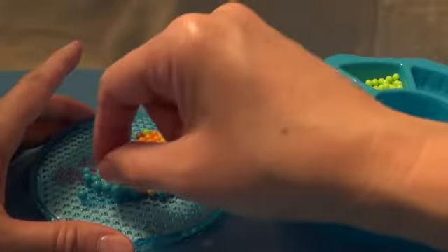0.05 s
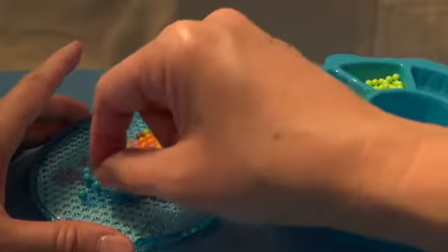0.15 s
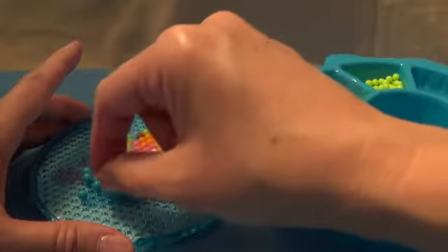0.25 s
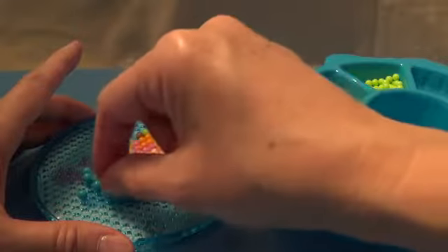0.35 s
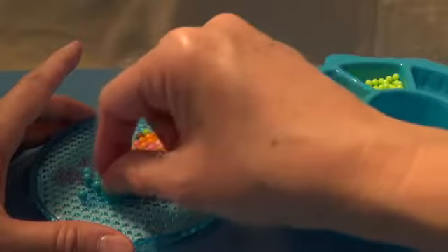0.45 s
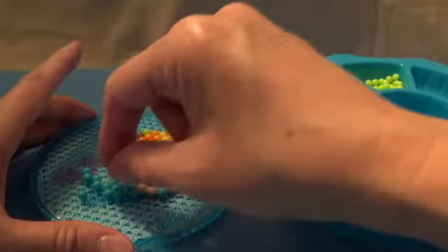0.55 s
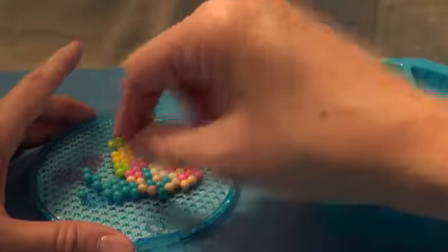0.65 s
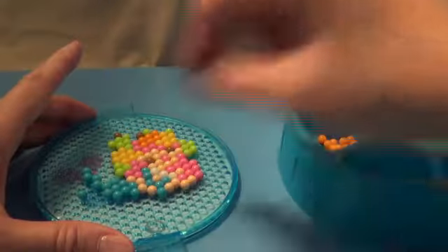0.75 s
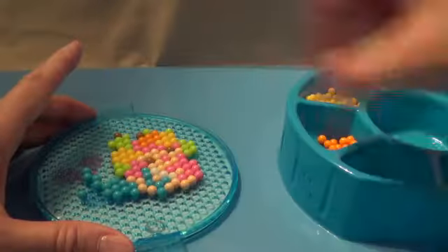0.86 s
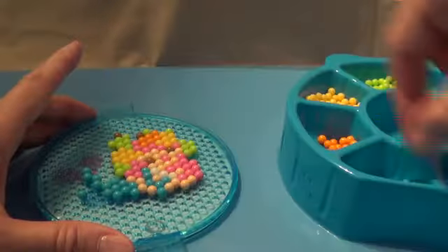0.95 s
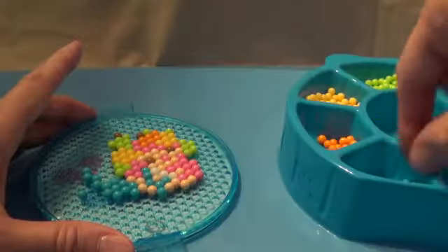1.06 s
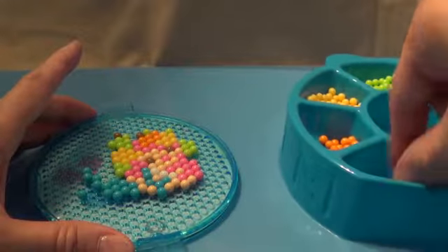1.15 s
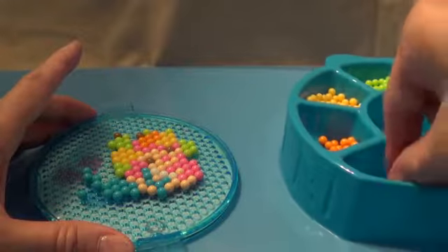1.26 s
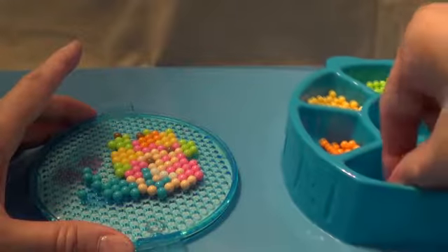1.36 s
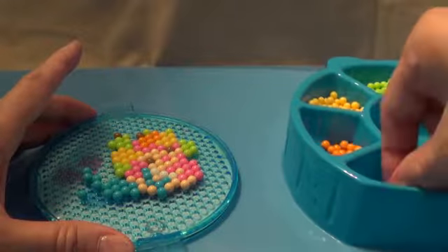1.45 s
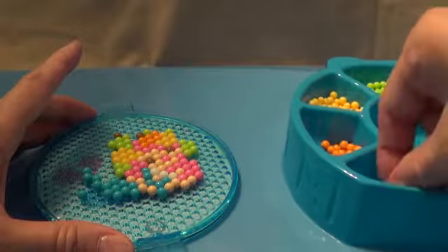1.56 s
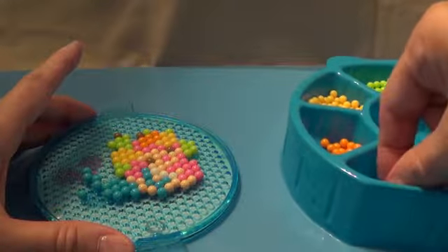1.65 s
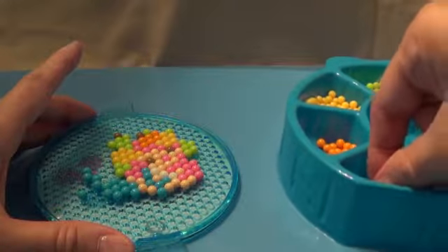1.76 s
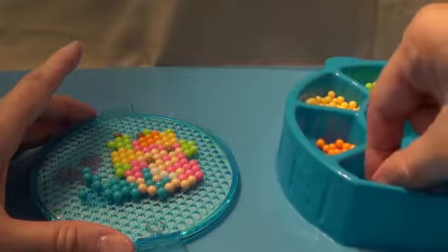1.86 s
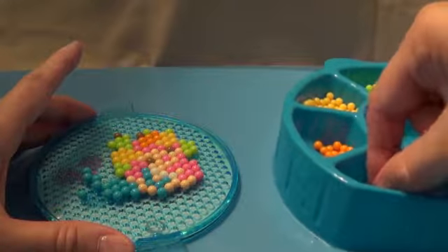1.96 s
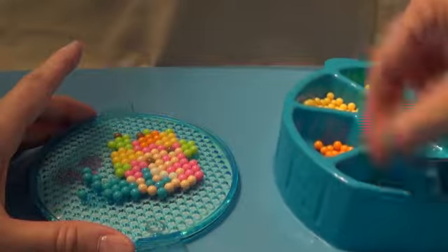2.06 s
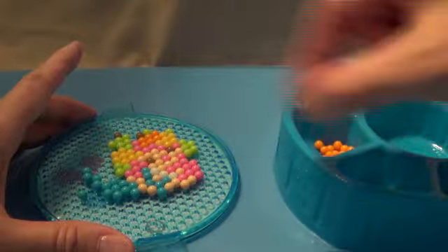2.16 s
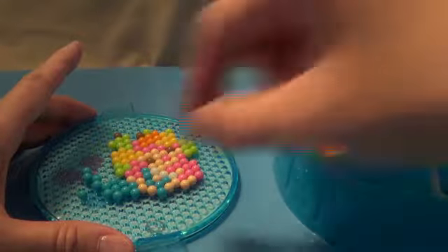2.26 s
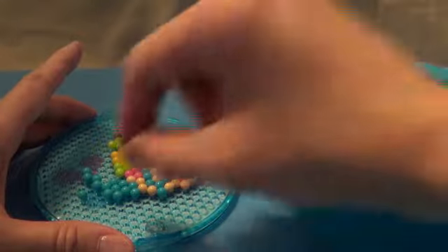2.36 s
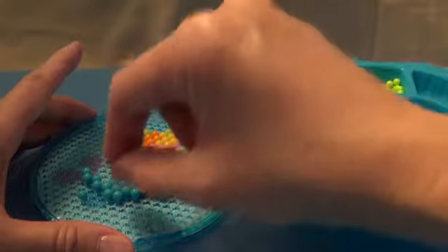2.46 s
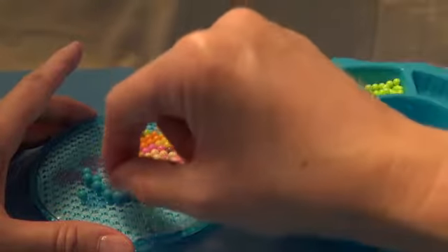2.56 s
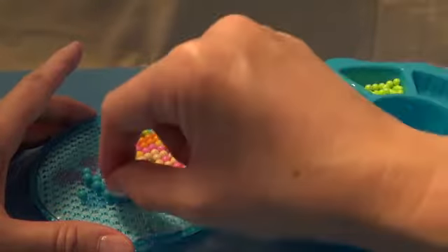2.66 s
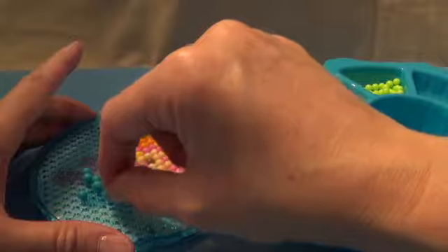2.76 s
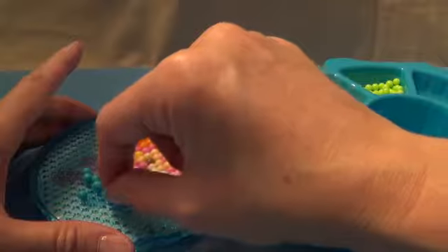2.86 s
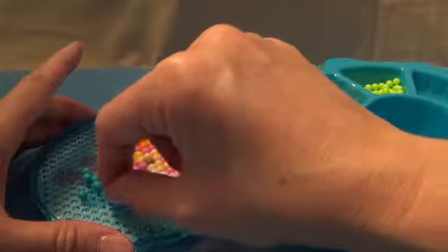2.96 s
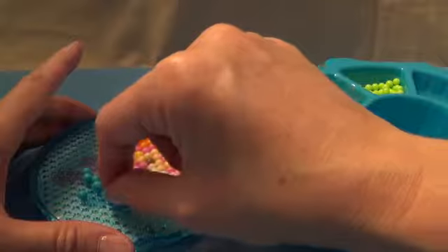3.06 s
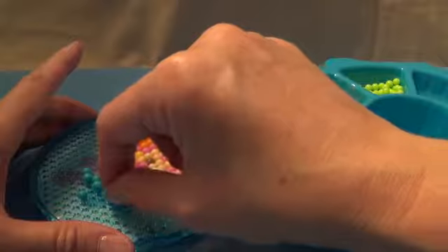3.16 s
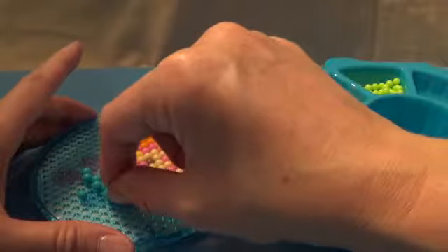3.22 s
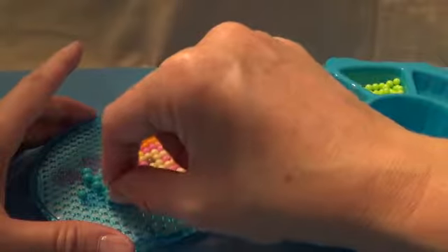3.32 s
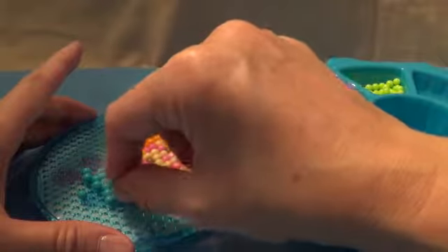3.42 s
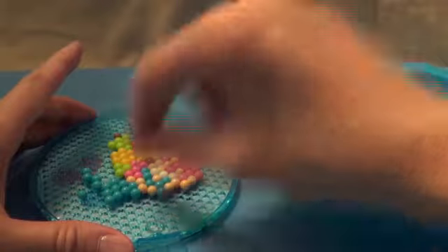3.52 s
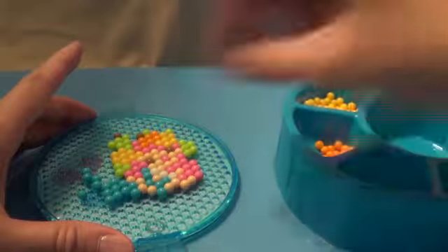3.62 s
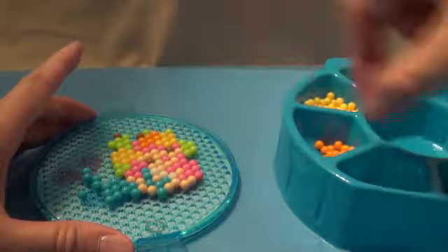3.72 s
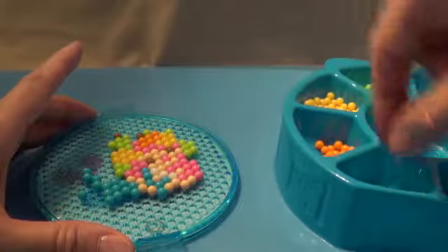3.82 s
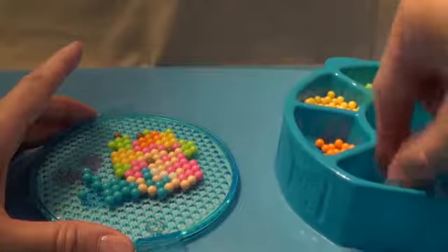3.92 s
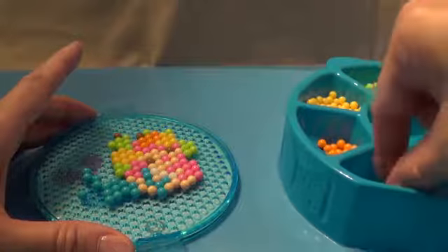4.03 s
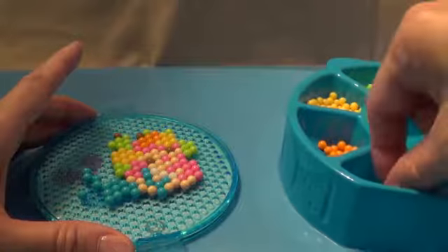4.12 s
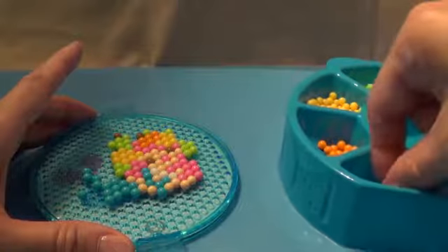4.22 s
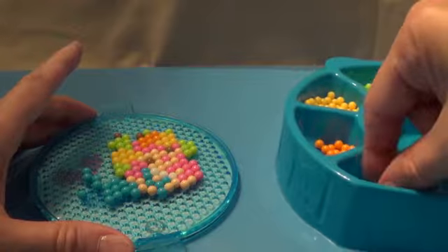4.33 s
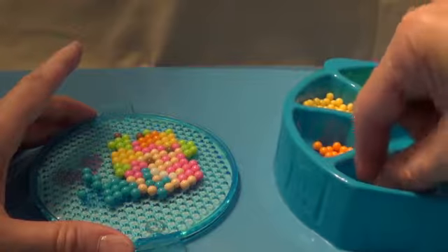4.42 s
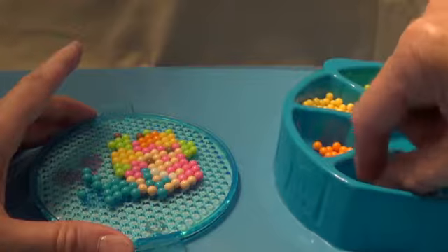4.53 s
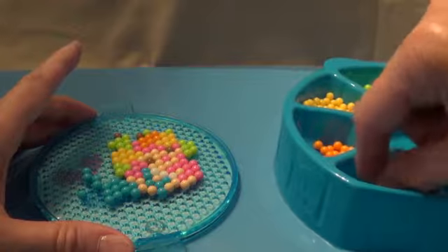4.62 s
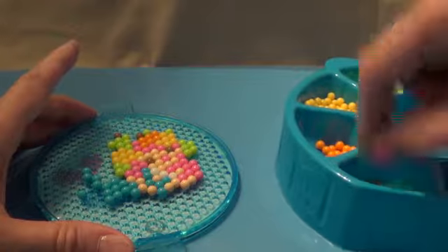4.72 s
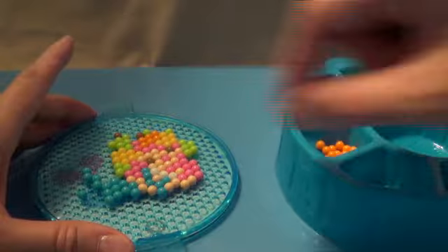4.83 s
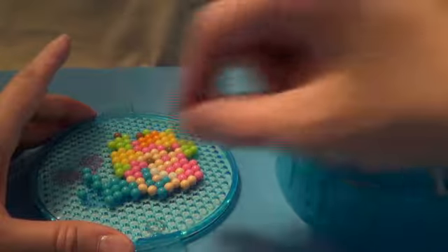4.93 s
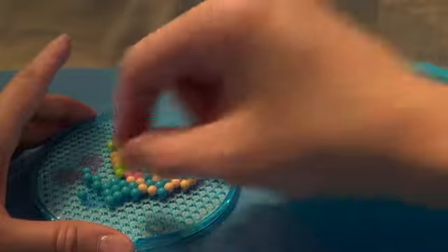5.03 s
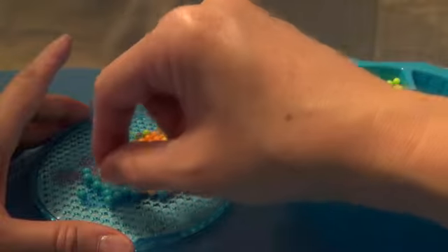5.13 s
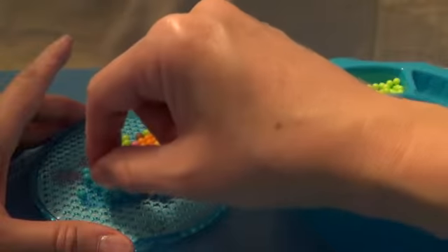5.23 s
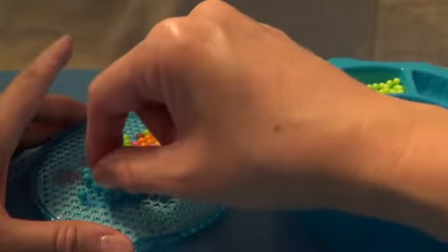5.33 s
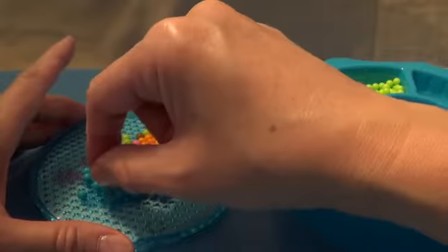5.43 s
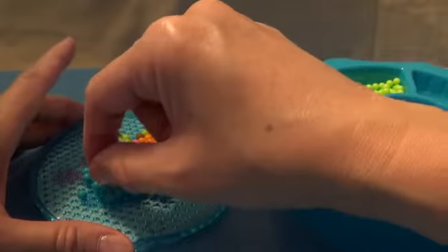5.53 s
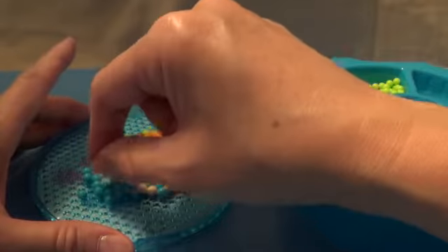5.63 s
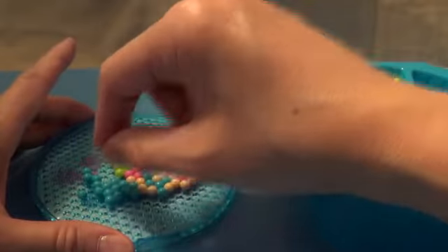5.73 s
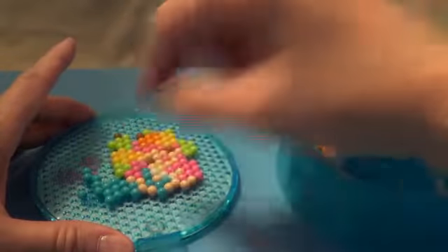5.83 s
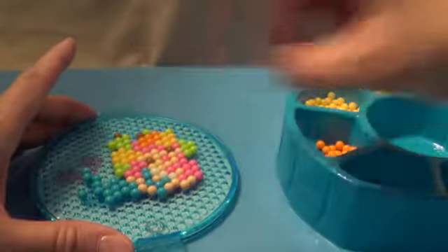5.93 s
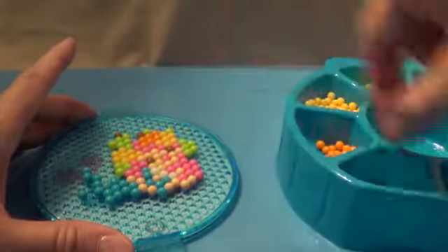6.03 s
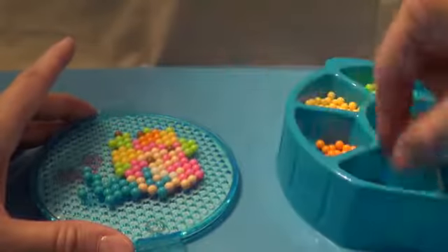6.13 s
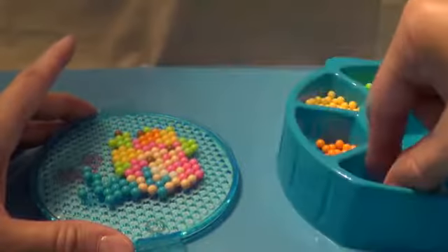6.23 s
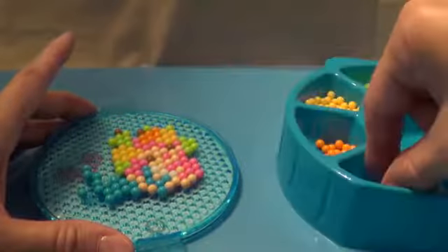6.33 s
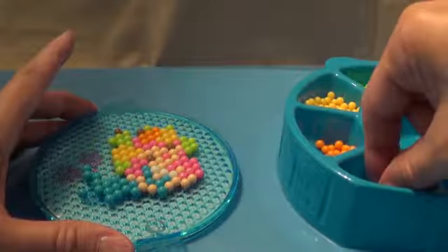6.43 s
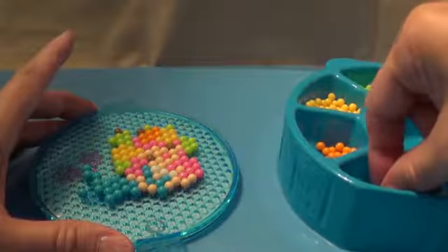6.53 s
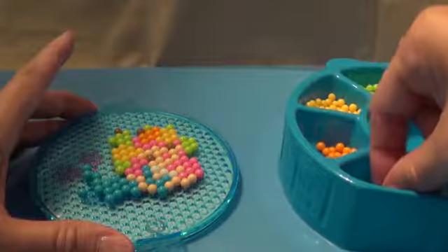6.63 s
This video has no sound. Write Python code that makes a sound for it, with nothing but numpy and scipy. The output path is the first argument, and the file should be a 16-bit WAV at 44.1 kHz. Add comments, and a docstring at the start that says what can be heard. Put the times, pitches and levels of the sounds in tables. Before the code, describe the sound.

Fingers stir small plastic beads in a plastic tray with clattering knocks, then single beads snap sharply into a pegboard, over quiet room hum.

```python
"""Beads from a sorting tray onto a pegboard

Close up in a quiet room, fingers stir small plastic beads in a plastic tray on the right and knock them
against it; beads snap into a pegboard near the middle. Knocks and snaps are noise bursts with ringing modes,
the stirring is a stream of tiny collisions over rubbing noise, and the creaks are short coloured bursts.
The moving arm swishes faintly over low ventilation noise, mains hum and a thin electronic whine.
A diffuse room tail surrounds the beads, and a close pair of capsules narrows the bass."""
import sys
import numpy as np
from scipy import signal
from scipy.fft import rfft, irfft, next_fast_len
from scipy.io import wavfile

SR = 44100
rng = np.random.default_rng(int(sys.argv[2]) if len(sys.argv) > 2 else 0)


def dump_mix(stems):
    """Bounce the given channels to the path in sys.argv[1] as a 16-bit WAV at rate SR."""
    frames = np.atleast_2d(stems).T  # one column per channel
    limited = np.clip(frames, -1, 1)  # hard clip at full scale
    pcm = np.round(limited * 32767).astype(np.int16)
    wavfile.write(sys.argv[1], SR, pcm)


N = 294588

# beads snapping into the board: start_s, level_db, wait until the rebound (wait_s)
SNAPS = [(0.5553, -27.5, 0.022), (3.4718, -29, .0096), (5.6608, -28, .0211)]
# colour of loose beads grating on each other: frequency_hz, relative level_db
RATTLE = [(100, -50), (750, 9.5), (2100, 5.5), (2800, 3), (3600, 1.5), (4300, 7), (5200, -9), (6200, 4),
          (8000, -9), (10500, -5.5), (15000, -44)]

HIT_T = np.arange(SR // 10) / SR   # time axis of one contact, s
COLLISIONS_PER_S = 400   # tiny contacts in a shove or a spell of creaking


def from_db(db):
    """Decibels to gain."""
    return 10 ** (np.asarray(db) / 20)


def rms_one(x):
    """Scale to unit power."""
    return x / np.sqrt(np.mean(x ** 2) + 1e-20)


def at_hz(points, hz):
    """Read a table on a log-frequency axis."""
    table_hz, value = np.transpose(points)
    return np.interp(np.log(np.maximum(hz, 1)), np.log(table_hz), value)


def cut(x, hz, kind, order=2):
    """Causal Butterworth filter."""
    return signal.sosfilt(signal.butter(order, hz, kind, fs=SR, output="sos"), x)


def noise(spectrum, size):
    """Noise of unit power with the given colour, made from random phases."""
    padded = next_fast_len(size)
    phases = np.exp(2j * np.pi * rng.random(padded // 2 + 1))
    gain = from_db(at_hz(spectrum, np.fft.rfftfreq(padded, 1 / SR)))
    return rms_one(irfft(phases * gain, padded)[:size])


def add(track, s, sound):
    """Mix a sound in at a time in seconds."""
    start = max(round(s * SR), 0)
    track[start:start + len(sound)] += sound[:max(N - start, 0)]


def burst(spectrum, t60):
    """Countless weak modes dying together, as decaying coloured noise."""
    return noise(spectrum, len(HIT_T)) * from_db(-60 * HIT_T / t60)


def strike(modes, signs):
    """Ring every mode of a body with a strength that depends on the spot."""
    spot_spread_db, detune = 3, .006   # detune is a fraction of the pitch
    hz, db, t60 = np.transpose(modes)[:, :, None]
    strength = signs * from_db(db + spot_spread_db * rng.standard_normal(hz.shape))
    # the hand loads the plastic differently each time
    hz = hz * (1 + detune * rng.standard_normal(hz.shape))
    rings = np.sin(2 * np.pi * hz * HIT_T) * from_db(-60 * HIT_T / t60)
    return np.sum(strength * rings, axis=0)


def weigh(hit, body_db, edge_db):
    """Set the first 5 ms of body, middle and edge: heavy contacts have body, hard ones have edge."""
    body_hz, edge_hz = 1300, 4500
    body = -cut(hit, body_hz, "low", order=6)   # inverted, so that it joins the middle without a notch
    middle = cut(cut(hit, body_hz, "high", order=6), edge_hz, "low", order=4)
    edge = cut(hit, edge_hz, "high", order=4)
    weighed = 0
    for part, db in ((body, body_db), (middle, 0), (edge, edge_db)):
        weighed = weighed + from_db(db) * part / np.std(part[:SR // 200])
    return weighed


def play(rows, hit):
    """Sound hit(s) once for each row of start_s, level_db of the middle, body_db, edge_db."""
    out = np.zeros(N)
    for s, db, body_db, edge_db in rows:
        add(out, s, from_db(db) * weigh(hit(s), body_db, edge_db))
    return out


def tray_hit(s):
    """A bead on a tray wall: a dry crack, walls swinging with mixed signs, a diffuse rattle of the shell."""
    # tray modes: frequency_hz, relative level_db, t60_s
    tray_modes = [(1433, -2, 0.03), (1648, 4.5, .028), (1780, 9.5, 0.025), (2170, 8, 0.024),
                  (2874, 8.5, 0.025), (3400, 7, 0.014), (3570, 4, 0.018), (4310, 4.5, 0.012),
                  (7000, -3, 0.01)]
    # colour of the contact: frequency_hz, relative level_db
    crack = [(80, -11), (400, -3.5), (800, 4), (1200, 1), (1700, 13.5), (4300, 5), (7500, 0), (11000, -6),
             (16000, -32)]
    # the lowest ring depends on which wall is struck: from_s, ring_hz
    walls = [(0, 755), (2.06, 1212), (2.1, 470), (2.2, 728), (6, 920)]
    wall_hz = [hz for start, hz in walls if start <= s][-1]
    modes = list(tray_modes) + [(wall_hz, -3, 0.036)]
    hit = strike(modes, signs=rng.choice([-1, 1], (len(modes), 1)))
    hit = hit + from_db(15.0) * burst(crack, t60=0.014)
    hit = hit + from_db(-4.0) * burst(crack, t60=0.071)
    return hit * (1 - np.exp(-HIT_T / 0.0003))   # bending waves need a moment to spread over the shell


def bead_click(spectrum, t60):
    """A light contact with a pitch of its own: it swells within a millisecond and dies quickly."""
    # range of click pitch, which depends on where the bead sits: lowest_hz, highest_hz
    ring_range = (2410, 7050)
    rise_s = 0.00042   # the click builds up as it spreads into the tray floor
    hz = ring_range[0] * (ring_range[1] / ring_range[0]) ** rng.random()
    colour_db = at_hz(spectrum, hz) - max(db for _, db in spectrum)
    ring = np.sin(2 * np.pi * hz * HIT_T) * from_db(colour_db - 60 * HIT_T / t60)
    return (burst(spectrum, t60) + np.sqrt(2) * ring) * (1 - np.exp(-HIT_T / rise_s))


def knocking():
    """Knocks on the walls of the tray, and the lighter clicks of bead on bead."""
    # beads and nails hitting the tray: start_s, level_db, body_db (weight), edge_db (hardness)
    knocks = [(1.2443, -45.5, 6.5, 2), (1.3855, -37, -4, -4), (1.4046, -34.5, -2.5, 3),
              (1.5445, -23.5, -7, 0), (1.619, -34, -15, -3), (1.6298, -22, -6.5, -18.5),
              (1.7138, -38, -15, 2.5), (1.881, -39, 6, 12.5), (1.8893, -37.5, 0, 9),
              (1.9642, -20, -10.5, -6), (2.0701, -28.5, -0.5, -8.5), (2.1231, -18.5, -13, -5),
              (2.1295, -15.5, -12, -8), (2.1413, -18, -8, -4.5), (2.1502, -14.5, -25, -9),
              (2.1562, -25, -27, -6), (2.162, -18.5, -3.5, -8), (2.2489, -30.5, 1, -9),
              (2.2758, -45, 3, -6), (3.6748, -39, -5.5, -0.5), (4.1085, -33, 1.5, -4),
              (4.1651, -29, -7, 1.5), (4.2848, -43, 9, 13.5), (4.3387, -36, -3.5, -0.5),
              (4.4354, -37.5, 4.5, 5.5), (4.4766, -35.5, 0, 1), (4.5504, -35.5, -2, -5),
              (4.5664, -17.5, -12.5, -12), (4.5906, -20.5, -9, -10), (4.6244, -21.5, -2.5, -3),
              (4.6705, -31.5, -17, 4), (4.7002, -24.5, -2, -10.5), (4.894, -32.5, 0, -4.5),
              (4.9198, -37.5, 0.5, -8), (6.3248, -25, 0, 2), (6.3295, -31, 0.5, 1),
              (6.3688, -38.5, 6.5, -17), (6.4609, -37.5, -3, 4.5), (6.565, -30.5, -2, 3),
              (6.5702, -24.5, 0.5, -5), (6.5966, -27, -10, 4.5), (6.6047, -34, -1, 0)]
    # one bead clicking against another: start_s, level_db
    tick_table = [(1.4081, -35), (1.4133, -36), (1.4229, -39), (1.4747, -50), (1.563, -33), (1.5699, -33),
                  (1.5855, -39), (1.599, -42), (1.665, -39.5), (1.682, -41), (1.691, -43), (1.709, -40),
                  (1.7185, -35.5), (1.8925, -33), (4.185, -37), (4.2027, -44), (4.211, -54), (4.297, -35),
                  (4.309, -41), (4.447, -41), (4.676, -35), (4.682, -38), (4.925, -46), (6.43, -46),
                  (6.496, -44), (6.577, -33), (6.5908, -27.5), (6.6084, -35), (6.616, -37), (6.629, -43),
                  (6.636, -39), (6.66, -41)]
    ticks = [(s, db, -8, -3) for s, db in tick_table]   # body and edge in dB re the middle
    return play(knocks, tray_hit) + play(ticks, lambda s: bead_click(RATTLE, t60=0.018))


def grains(spectrum, per_s, count=40):
    """A random stream of tiny contacts, uneven in size, each spot with its own sound; unit power."""
    size_spread_db = 25   # softest to hardest
    spots = rng.integers(0, count, round(per_s * N / SR))
    sounds = [bead_click(spectrum, t60=.009) for spot in range(count)]
    out = np.zeros(N)
    for spot, (when, size) in zip(spots, rng.random((len(spots), 2))):
        add(out, when * N / SR, from_db(size_spread_db * size) * sounds[spot])
    return rms_one(out)


def gesture(start, length, attack, release):
    """Level of a hand movement: rise, hold and die away; attack and release are seconds for 60 dB."""
    out, t = np.zeros(N), np.arange(-attack, length + release, 1 / SR)
    level_db = np.interp(t, [-attack, 0, length, length + release], [-60, 0, 0, -60])
    add(out, start - attack, from_db(level_db))
    return out


def stirring():
    """Beads jostle while fingertips rub the tray floor; each shove sets off dense rattle and louder rubbing."""
    # the fingers are in the tray: start_s, end_s
    visits = [(1.345, 2.4), (4.12, 4.86), (6.33, 6.682)]
    # a fingertip shoves through the beads: start_s, length_s, rattle_db, rub_db
    shoves = [(1.55, 0.024, -28.5, -32.5), (1.643, 0.05, -36.5, -43), (1.885, 0.0096, -36.5, -37),
              (4.141, .015, -40, -35), (4.158, 0.049, -35, -36.5), (4.293, 0.017, -35, -44),
              (4.472, 0.021, -37, -41), (4.651, 0.02, -34, -34.5), (6.446, 0.0077, -42.5, -49),
              (6.576, 0.049, -40.5, -52)]
    # the beads give way at once, the soft fingertip more gradually
    rattle_attack_s, rattle_settle_s = .02, 0.15
    rub_attack_s, rub_release_s = 0.044, 0.2
    idle_db, idle_rub_db = -53.5, 2.5   # jostling between shoves, and rubbing re that jostling
    idle_collisions_per_s = 170

    idle = 0
    for start, end in visits:
        idle = idle + from_db(idle_db) * gesture(start, end - start, rattle_attack_s, rattle_settle_s)
    rattle, rubbing = 0, from_db(idle_rub_db) * idle
    for s, length, rattle_db, rub_db in shoves:
        shove_rattle = from_db(rattle_db) * gesture(s, length, rattle_attack_s, rattle_settle_s)
        shove_rub = from_db(rub_db) * gesture(s, length, rub_attack_s, rub_release_s)
        rattle = np.maximum(rattle, shove_rattle)
        rubbing = np.maximum(rubbing, shove_rub)
    # frequency_hz, relative level_db
    rub = noise([(50, -21), (140, -2.0), (420, -0.5), (620, -11), (1700, -6.0), (9000, -27)], N)
    dense = grains(RATTLE, COLLISIONS_PER_S)
    sparse = grains(RATTLE, idle_collisions_per_s)
    return rattle * dense + idle * sparse + rubbing * rub


def tray_thud(s, hz, db, t60):
    """A fingertip presses the whole tray down on the table: one decaying low sine."""
    out, t = np.zeros(N), np.arange(SR // 4) / SR
    add(out, s, np.sin(2 * np.pi * hz * t) * from_db(db - 60 * t / t60))
    return out


def board_hit():
    """A snap on the small stiff pegboard: a sharp broad spike, a brief shiver and a trace of ring."""
    # pegboard modes: frequency_hz, relative level_db, t60_s
    modes = [(2060, -7, 0.012), (9700, 7, 0.0057)]
    # colour of the contact: frequency_hz, relative level_db
    crack = [(800, -34), (2000, -1.5), (3000, 7), (5200, -3), (7500, 9), (10500, 12), (13000, -8),
             (16000, -20)]
    spike = from_db(12.0) * burst(crack, t60=0.0021)
    shiver = from_db(2.0) * burst(crack, t60=0.013)
    return spike + shiver + strike(modes, signs=1)


def snapping():
    """Each bead snaps into its dimple and rebounds once, softer and duller; the nearest wall answers."""
    body_db, edge_db = -38, 6.5   # re the middle
    rebound_loss_db, rebound_dulling_db = 10, 5.5
    echo_s, echo_db = .0143, -23
    snaps = [(s, db, body_db, edge_db) for s, db, wait in SNAPS]
    rebounds = [(s + wait, db - rebound_loss_db, body_db, edge_db - rebound_dulling_db)
                for s, db, wait in SNAPS]
    out = play(snaps + rebounds, lambda s: board_hit())
    add(out, echo_s, from_db(echo_db) * out)
    return out


def spill():
    """The underside of the board sends a broad crack sideways, heard only by way of the walls."""
    # colour of the crack: frequency_hz, relative level_db
    crack = [(800, -29), (2000, 3.5), (4500, 1), (7500, 6), (10500, -4), (15000, -24)]
    spill_db = 13   # re the snap's level
    out = np.zeros(N)
    for s, db, wait in SNAPS:
        add(out, s, from_db(db + spill_db) * burst(crack, t60=0.018))
    return out


def creaking():
    """The pinched bead touches down and slips in small jerks over the dimples."""
    # a bead creaking under the fingertips as it is eased into place: start_s, level_db
    nudges = [(.0243, -40), (0.1347, -45), (.174, -44), (0.194, -39), (2.5025, -42), (2.526, -39),
              (2.5452, -45), (2.604, -41), (2.628, -44), (2.7137, -40), (2.857, -38)]
    # spells of smaller creaks: start_s, end_s
    fidgets = [(0.01, 0.225), (2.472, 2.848)]
    # colour of a creak: frequency_hz, relative level_db
    creak = [(600, -6), (2000, -2.5), (3100, -0.5), (4000, -19), (9000, -23)]
    fidget_db = -58.5
    touch_s, touch_db = 2.463, -37.5   # the carried bead clicks against its neighbours on the board
    t = np.arange(N) / SR
    fidgeting = sum((t > start) * (t < end) for start, end in fidgets)
    out = from_db(fidget_db) * grains(creak, COLLISIONS_PER_S) * fidgeting
    for s, db in nudges:
        add(out, s, from_db(db) * burst(creak, t60=0.015))
    add(out, touch_s, from_db(touch_db) * burst(RATTLE, t60=0.027))
    return out


def arm():
    """The arm swings between tray and board: high noise swells softly with each swing."""
    # swings: peak_s, level_db
    swings = [(0.0, -58), (1.063, -56.5), (2.47, -57), (3.92, -57.5), (5.19, -54), (6.156, -56)]
    # colour of the swish: frequency_hz, relative density_db per Hz
    swish = [(4000, 3), (9000, 6.5), (12300, 13.5), (16000, 0)]
    swing_sigma_s = 0.091   # standard deviation of the bell-shaped swell
    t = np.arange(N) / SR
    level = sum(from_db(db) * np.exp(-((t - s) / swing_sigma_s) ** 2 / 2) for s, db in swings)
    return noise(swish, N) * level


def place(x, left_db, scatter_db):
    """Pan by level; the table and hands scatter a little sound differently to each side."""
    scatter_delay_s = .0005
    scatter = rng.standard_normal(len(HIT_T)) * from_db(-60 * HIT_T / 0.01) * (HIT_T > scatter_delay_s)
    scattered = signal.oaconvolve(x, scatter / np.linalg.norm(scatter))[:N]
    side = from_db(scatter_db) * scattered
    return x * from_db([[left_db / 2], [-left_db / 2]]) + side * [[1], [-1]]


def room(x, wet_db, width):
    """After the path to the nearest wall, a diffuse tail of noise bands, each fading at its own rate."""
    # reverberation time: frequency_hz, t60_s
    fade = [(2000, 0.35), (6000, 0.27), (14000, 0.51)]
    # colour of the tail: frequency_hz, level_db
    colour = [(450, 12.5), (900, 4), (1600, 0.5), (3200, 2.5), (6000, -2), (14000, -2)]
    t = np.arange(int(.6 * SR)) / SR
    edges = np.geomspace(100, 17000, 11)   # band edges, Hz
    response = 0
    for low, high in zip(edges, edges[1:]):
        hz = np.sqrt(low * high)
        mid, side = cut(rng.standard_normal((2, len(t))), [low, high], "band")
        tail_db = wet_db + at_hz(colour, hz) - 60 * t / at_hz(fade, hz)
        tail = from_db(tail_db) * (t > .012)
        response = response + (mid + width * side * [[1], [-1]]) * tail
    return signal.oaconvolve(x, response, axes=1)[:, :N]


def background(width_db):
    """Ventilation rumble and hiss, diffuse from 550 to 5000 Hz, with steady hum and whine as sines."""
    # colour of the ventilation: frequency_hz, relative density_db per Hz
    air = [(20, -28), (60, -13.5), (107, -4.5), (158, -4), (228, 1), (388, -4.5), (642, -18), (976, -21.5),
           (2080, -26.5), (13900, -36.5), (16000, -48)]
    # steady tones: pitch_hz, rms level_db
    hum = [(29.5, -66), (120, -63), (240, -54), (15734, -66.5)]
    air_db = -45.5
    t = np.arange(N) / SR
    tones = 0
    for hz, db in hum:
        tones = tones + np.sqrt(2) * from_db(db) * np.sin(2 * np.pi * (hz * t + rng.random()))
    side = cut(noise(air, N), [550, 5000], "band") * from_db(width_db)
    return from_db(air_db) * (noise(air, N) + side * [[1], [-1]]) + tones


def scene():
    """Tray on the right, board near the middle, both in the room."""
    thud = tray_thud(1.625, hz=97.0, db=-32.0, t60=0.17)
    tray = place(knocking() + stirring() + thud, left_db=-2.0, scatter_db=-15.5)
    creaks = creaking()
    board = place(snapping() + creaks, left_db=0.5, scatter_db=-16.0)
    walls = room(tray + creaks + spill(), wet_db=-47.0, width=0.22)
    return tray + board + walls + arm() + background(width_db=-4.0)


def record(dry):
    """The image narrows in the bass, the hardest peaks are rounded, and the top is cut steeply."""
    # the two capsules sit close together, so the bass is alike in both: frequency_hz, side gain_db
    side_gain = [(180, -5.5), (380, -6), (700, 1), (9000, 3), (15000, -1)]
    headroom = .9   # level at which the microphone stage saturates
    cutoff_hz = 16400
    mid, side = (dry[0] + dry[1]) / 2, (dry[0] - dry[1]) / 2
    gain = from_db(at_hz(side_gain, np.fft.rfftfreq(N, 1 / SR)))
    side = irfft(rfft(side) * gain, N)
    rounded = headroom * np.tanh((mid + side * [[1], [-1]]) / headroom)
    return signal.sosfilt(signal.ellip(10, .1, 90, cutoff_hz, fs=SR, output="sos"), rounded)


dry = scene()
out = record(dry)
dump_mix(out)
```